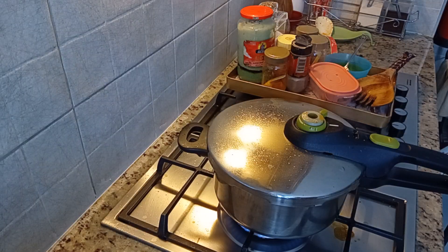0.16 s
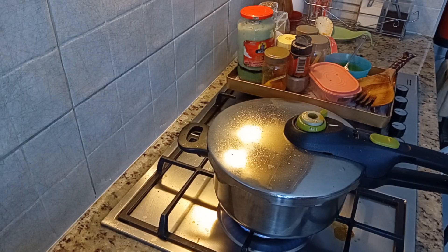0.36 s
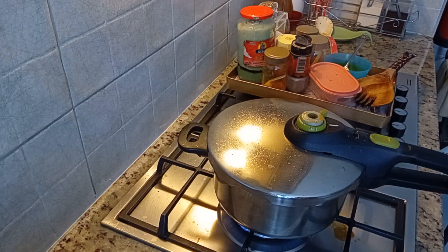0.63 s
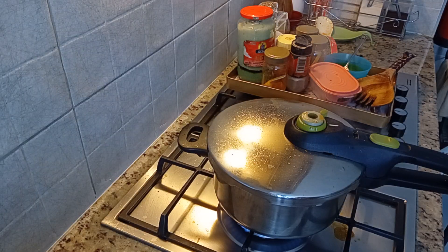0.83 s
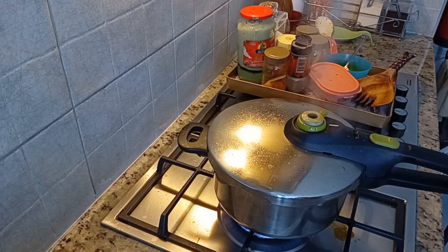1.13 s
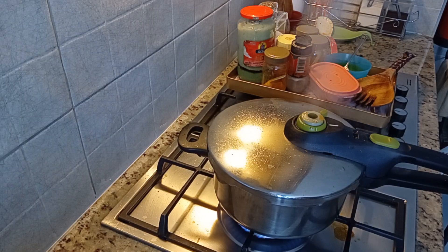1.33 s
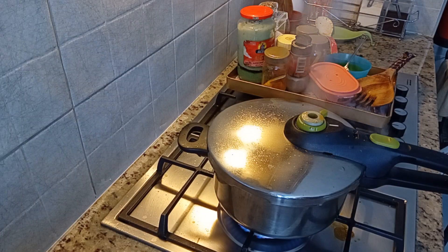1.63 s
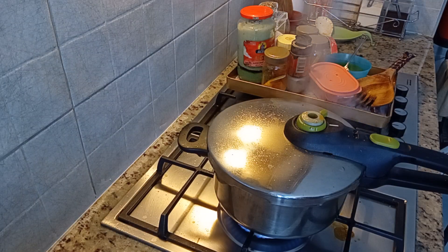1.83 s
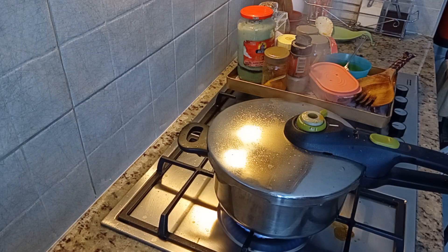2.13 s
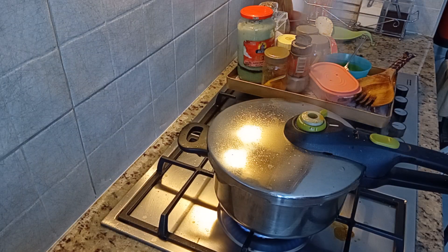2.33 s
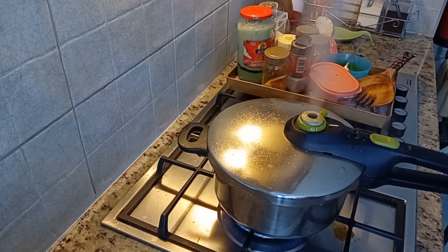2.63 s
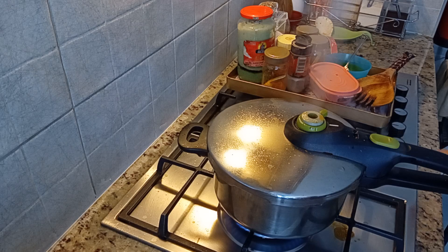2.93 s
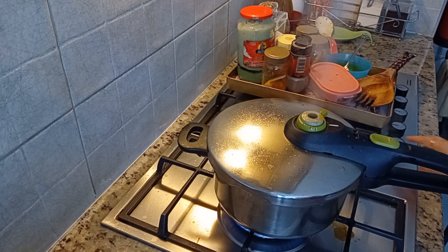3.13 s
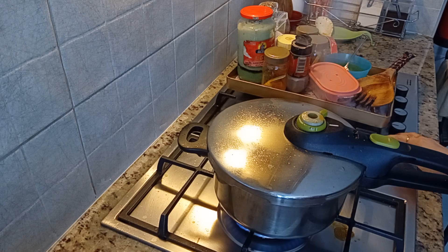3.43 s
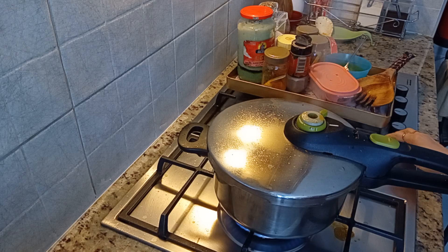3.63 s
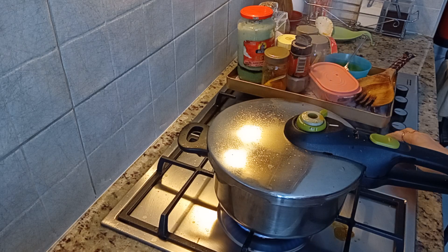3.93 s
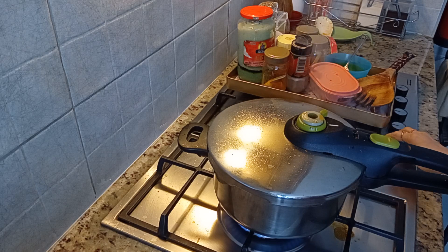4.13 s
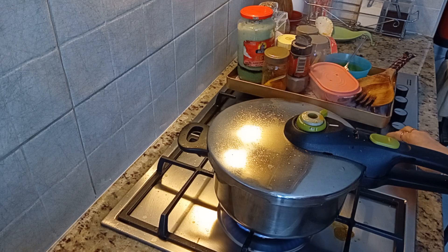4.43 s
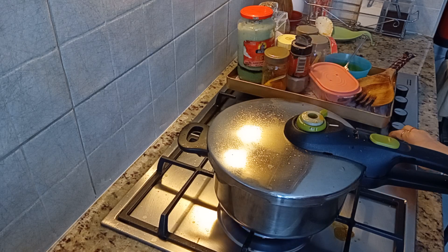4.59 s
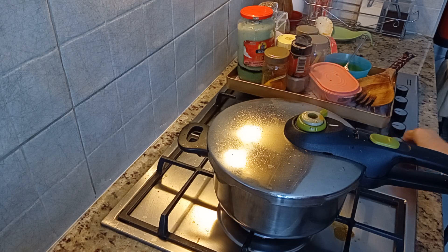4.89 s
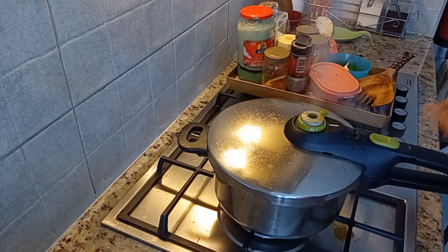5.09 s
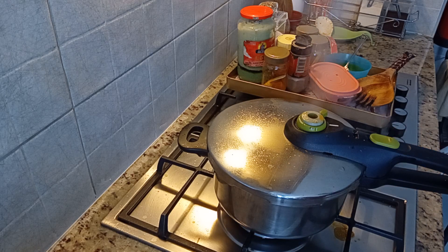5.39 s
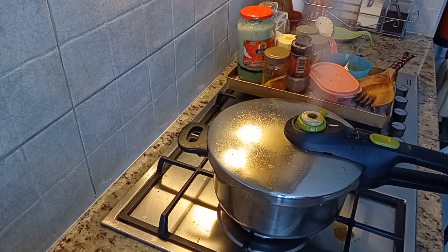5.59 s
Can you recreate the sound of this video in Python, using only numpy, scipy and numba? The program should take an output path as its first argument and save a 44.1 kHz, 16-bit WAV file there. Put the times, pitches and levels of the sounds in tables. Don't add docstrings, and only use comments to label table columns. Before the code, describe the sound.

A pressure cooker on a gas stove vents steam for about 5.7 seconds, heard close in mono in a tiled kitchen with little reverberation. A sharp, bright hiss runs at an even level throughout, airy at the top and slightly resonant. Until about 1.2 seconds, brief thin whistles catch by turns at a high and a lower pitch, strongest around 0.75 to 0.9 and 1.1 to 1.2. Near 0.9 to 1.2 a short, rough, rising squeak comes echoing from another room. From about 1.3 a stronger, breathy, beating whistle takes over, locking on and collapsing in irregular quick pulses, its high pitch wandering; it is especially clear around 1.9 to 2.5. Ringing lid tones flare briefly here and there. Underneath, the burner rumbles and hums very quietly, with soft low puffs, more noticeable near 4.95 and 5.45. After 5.2 the main whistle sags and weakens while a faint lower tone climbs and frays.

```python
import sys
import numpy as np
from scipy import signal
from scipy.fft import rfft, irfft
from scipy.io import wavfile
from scipy.ndimage import uniform_filter1d
from numba import njit

SR = 44100
rng = np.random.default_rng(int(sys.argv[2]) if len(sys.argv) > 2 else 0)


def convert_level_to_amplitude(level_db):
    exponent = np.asarray(level_db, float) / 20
    return 10 ** exponent


def master(y):
    cut = np.clip(np.atleast_2d(y).T, -1, 1)
    pcm = np.round(cut * 32767)
    wavfile.write(sys.argv[1], SR, pcm.astype(np.int16))


N = 253575


def level(x, db):
    return x * convert_level_to_amplitude(db) / np.sqrt(np.mean(x ** 2))


def noise(size=N):
    return rng.standard_normal(size)


@njit
def svf(x, hz, width):
    y, b, l = np.empty(len(x)), 0., 0.
    for i in range(len(x)):
        g, k = np.tan(np.pi * hz[i] / SR), width[i] / hz[i]
        v = (b + g * (x[i] - l)) / (1 + g * (g + k))
        b, l, y[i] = 2 * v - b, l + 2 * g * v, k * v
    return y


def colour(x, spectrum):
    hz, db = np.transpose(spectrum)
    grid = np.fft.rfftfreq(len(x), 1 / SR) + 1
    gain = convert_level_to_amplitude(np.interp(np.log(grid), np.log(hz), db))
    return irfft(rfft(x) * gain, len(x))


def walk(rate):
    k = int(SR / rate)
    held = np.repeat(rng.standard_normal(N // k + 1), k)
    w = uniform_filter1d(uniform_filter1d(held, k), k)[:N]
    return w / np.std(w)


def steady(x, hold_s, share):
    power = uniform_filter1d(x ** 2, int(max(hold_s, .002) * SR)) + 1e-18
    return level(x * power ** (-share / 2), 0)


def ring(hz, width, size=N):
    hz = hz * np.ones(size)
    width = 1.205 * width * np.ones(size)
    return svf(svf(noise(size), hz, width), hz, width) / np.sqrt(width)


def modes(table, flicker_db, rate):
    total = 0
    for hz, width, db in table:
        flicker = convert_level_to_amplitude(db + flicker_db * walk(rate))
        total = total + flicker * np.sqrt(width) * ring(hz + 0.46 * width * walk(10), width)
    return level(total, 0)


def echo(x, t60, wet):
    t = np.arange(SR // 2) / SR
    tail = noise(len(t)) * 1000. ** (-t / t60) * (t > .003)
    tail = tail / np.sqrt(np.sum(tail ** 2))
    wet = np.clip(wet, 0, 1)
    return np.sqrt(1 - wet) * x + np.sqrt(wet) * signal.fftconvolve(x, tail)[:N]


def spells(table, rest_db, rise, fall):
    t = np.arange(N) / SR
    db = rest_db + 0 * t
    for start, end, top_db, *_ in table:
        build = 4 * np.clip((end - t) / (end - start), 0, 1)
        slopes = rise * np.maximum(start - t, 0) + fall * np.maximum(t - end, 0)
        db = np.maximum(db, top_db - build - slopes)
    return convert_level_to_amplitude(db)


def jet():
    # (frequency [Hz], density [dB per Hz])
    body_spectrum = [(380, -23.5), (650, -21.5), (1100, -12), (1460, -16), (1910, -13), (2220, -17.5),
                     (2470, -12.5), (3410, -12), (3630, -13.5), (4000, -10.5), (5530, -5.5), (6640, -1),
                     (8500, -12), (11000, -59), (18700, -120)]
    top_spectrum = [(7500, -42), (8300, -31), (8900, -12.5), (9250, 2.5), (9500, 5), (9950, 3), (10400, 2),
                    (10800, -1.5), (11100, 0.5), (11400, -7), (11900, -7), (12200, -23), (13000, -37)]
    core_spectrum = [(11000, -45), (12000, -19), (12300, -16), (12700, -13), (13000, -17), (13900, -18),
                     (14200, -14), (14500, -8), (14900, -3), (15200, -1), (15900, 0)]
    # (frequency [Hz], width [Hz], level [dB])
    lid_modes = [(1120, 26, -8.5), (1926, 19.5, -5.5), (2394, 54, -4.5), (3430, 38.5, -2.5),
                 (3862, 90, -5.5), (4150, 26, -1), (5104, 54, 0.5)]
    stem_modes = [(6790, 96, 4), (6760, 66, -26), (7510, 49, -3), (8470, 47, -14), (8840, 58, -9)]
    nozzle_modes = [(9640, 72, -1.5), (10290, 61, 3.5), (10630, 180, -3), (11100, 96, -5)]

    body = level(colour(noise(), body_spectrum), -46) * convert_level_to_amplitude(1.19 * walk(9.44))
    top = level(colour(noise(), top_spectrum), -38) * convert_level_to_amplitude(0.49 * walk(12))
    flutter = convert_level_to_amplitude(.4 * walk(10) + .8 * walk(40) + 1.3 * walk(200))
    core_gain = convert_level_to_amplitude(-36 + 1.3 * (np.arange(N) / SR > 1.7))
    core = core_gain * level(flutter * colour(noise(), core_spectrum), 0)
    lid = level(modes(lid_modes, 3.9, 12), -56.5)
    stem = level(modes(stem_modes, 2.5, 22), -52.5)
    nozzle = level(modes(nozzle_modes, 0.75, 19), -44)
    return echo(body, t60=0.48, wet=0.1) + echo(top, 0.038, 0.05) + core + lid + stem + nozzle


def edge_tone(hz, gain, width, wobble):
    return gain * steady(ring(hz + wobble * width * walk(25), width), hold_s=.022, share=.9)


def locked(table, rest_db):
    return spells(table, rest_db, rise=352, fall=380)


def early_stages(t):
    # (start [s], end [s], level [dB], pitch [Hz])
    high_locks = [
        (-.02, .03, -47, 6600),
        (.19, .255, -52, 6790),
        (0.37, 0.483, -43.5, 6630),
        (.565, .6, -45, 6600),
        (0.726, 0.772, -39.5, 6760),
        (0.878, 0.925, -37.5, 6755),
        (1.098, 1.2, -48, 6850),
    ]
    # (start [s], end [s], level [dB])
    low_locks = [
        (.1, .2, -54),
        (.51, .59, -49),
        (.68, .71, -53),
        (.89, .975, -47),
        (1.05, 1.11, -41),
        (1.13, 1.21, -38.5),
        (1.23, 1.27, -47),
    ]
    early = np.clip((1.29 - t) / 0.028 + 1, 0, 1)

    middles = np.mean(np.array(high_locks)[:, :2], axis=1)
    high_hz = np.interp(t, middles, np.array(high_locks)[:, -1])
    high = convert_level_to_amplitude(0.5) * edge_tone(high_hz, early * locked(high_locks, -55), 43.0, 0.31)

    settle_s = [.88 - .02, .88 + .02]
    sag_hz = 1500 * np.maximum(t - low_locks[-1][0], 0)
    low_hz = np.interp(t, settle_s, (4810, 4736)) - sag_hz
    low_width = np.interp(t, settle_s, (62, 20))
    low = convert_level_to_amplitude(1.5) * edge_tone(low_hz, early * locked(low_locks, -58), low_width, 0.41)
    return high + low


def main_stage(t):
    # (time [s], pitch [Hz], resting level [dB], width [Hz])
    opening = [(1.24, 6180, -47, 170), (1.36, 6150, -44, 150), (1.43, 6000, -44, 150),
               (1.62, 6310, -45, 120), (1.8, 6460, -47, 120), (1.93, 6190, -43, 90), (2.32, 6235, -44, 85),
               (2.68, 6125, -42, 70), (2.82, 6280, -46, 90), (3.08, 6120, -43, 70), (3.55, 6140, -42, 50),
               (3.63, 6290, -45, 80), (4.03, 6190, -41, 55), (4.63, 6285, -41, 55), (5.03, 6040, -43, 55),
               (5.34, 6060, -43, 65), (5.42, 5925, -44, 50), (5.62, 5795, -47, 65)]
    # (start [s], end [s], level at the end [dB])
    main_locks = [(1.275, 1.31, -38), (1.36, 1.47, -34), (1.56, 1.62, -40.5), (1.9, 2.03, -34),
                  (2.06, 2.09, -33), (2.12, 2.195, -32.5), (2.24, 2.33, -36.5), (2.38, 2.535, -32),
                  (2.575, 2.6, -34.5), (2.63, 2.65, -36.5), (2.86, 2.94, -35), (2.985, 3.01, -36),
                  (3.375, 3.53, -33), (3.55, 3.58, -37), (3.82, 3.9, -37.5), (3.92, 4.0, -38),
                  (4.07, 4.14, -34.5), (4.18, 4.3, -36), (4.33, 4.42, -37.5), (4.465, 4.5, -32.5),
                  (4.565, 4.6, -38), (4.68, 4.75, -36.5), (4.8, 4.86, -32.5), (4.89, 4.98, -35.5),
                  (5.02, 5.1, -39), (5.17, 5.26, -39), (5.29, 5.35, -38), (5.4, 5.475, -33.5),
                  (5.535, 5.555, -38.5), (5.64, 5.71, -41.5)]
    s, *columns = np.transpose(opening)
    hz, rest_db, width = (np.interp(t, s, c) for c in columns)
    gain = locked(main_locks, rest_db) * np.clip((t - s[0]) / .02 + 1, 0, 1)
    strong_strand = edge_tone(hz - 12, gain, .8 * width, .3)
    weak_strand = convert_level_to_amplitude(-4) * edge_tone(hz + .9 * width, gain, .8 * width, .4)
    skirt = np.sqrt(gain) * level(ring(hz + 40., 750.0), -30.5)
    octave = gain * level(ring(2 * hz, 250.), -28)
    return strong_strand + weak_strand + skirt + octave


def late_stage(t):
    climb_s = np.maximum(t - 5.29, 0)
    hz = 2850 + 1450 * climb_s
    width = 45 + 800 * climb_s
    gain = convert_level_to_amplitude(-56) * np.clip((t - 5.2) / 0.023 + 1, 0, 1)
    return edge_tone(hz, gain, width, .3) * convert_level_to_amplitude(2.0 * walk(30))


def whistle():
    t = np.arange(N) / SR
    return early_stages(t) + main_stage(t) + late_stage(t)


def burner():
    # (frequency [Hz], density [dB per Hz])
    rumble_spectrum = [(15, -39), (25, 5), (44, -42), (86, -11), (161, 3), (297, -8.5), (368, -5),
                       (469, -1), (660, -8), (750, -6.5), (980, -1), (1650, -120)]
    # (frequency [Hz], width [Hz], level [dB])
    hum_modes = [(90.8, 10, 2), (162.7, 17, 3.5), (250, 26, -2), (320, 7.7, -3.5), (368, 17.3, 2),
                 (383, 11, -3), (425, 5.5, -1.5), (734, 14, -6.5), (970, 27.5, -3.5), (1270, 32, -3.5)]
    # (start [s], end [s], level [dB])
    flame_puffs = [(.14, .17, -64), (.36, .4, -58), (.755, .78, -58), (.85, .88, -68), (1.12, 1.15, -61.5),
                   (1.36, 1.42, -66), (2.0, 2.04, -61), (2.26, 2.3, -66), (2.33, 2.36, -59),
                   (2.56, 2.62, -66.5), (2.65, 2.7, -61), (3.13, 3.17, -66), (3.52, 3.6, -64.5),
                   (4.14, 4.19, -70), (4.28, 4.33, -69), (4.54, 4.57, -65), (4.93, 4.97, -55.5),
                   (5.03, 5.2, -66.5), (5.28, 5.31, -62.5), (5.44, 5.5, -52), (5.51, 5.56, -54.5),
                   (5.67, 5.71, -65)]
    rumble = level(colour(noise(), rumble_spectrum), -72)
    hums = level(modes(hum_modes, 1.5, 5.44), -67.0)
    puff_gain = spells(flame_puffs, -75.5, rise=202, fall=266)
    puffs = puff_gain * steady(ring(88.0, 59.0), hold_s=.04, share=0.85)
    return rumble + hums + puffs


def flares():
    # (middle [s], frequency [Hz], level [dB],
    # length [s])
    mode_flares = [(0.32, 3800, -54, 0.088), (0.36, 3430, -55, 0.061), (1.267, 3960, -53, 0.11),
                   (1.571, 2950, -54, 0.041), (1.74, 1930, -56.5, 0.06), (1.776, 972, -55.5, 0.055),
                   (2.133, 962, -59, 0.12), (2.25, 2650, -59, 0.15), (2.283, 320, -64.5, 0.063),
                   (2.283, 967, -58, 0.06), (2.461, 2394, -52, 0.12), (2.987, 2512, -53.5, 0.092),
                   (3.01, 4930, -48.5, 0.12), (3.292, 1096, -52.5, 0.055), (3.435, 3430, -56.0, 0.081),
                   (3.84, 3915, -55, 0.043), (3.909, 3430, -53, 0.061), (4.23, 4620, -54, 0.06),
                   (4.45, 5030, -52, 0.06), (4.463, 4310, -54, 0.083), (4.754, 3500, -55, 0.06),
                   (4.765, 5080, -49, 0.054), (4.916, 3920, -53, 0.051), (4.967, 4640, -49.5, 0.06),
                   (4.993, 485, -64.5, 0.045), (5.058, 2660, -56, 0.052), (5.51, 3890, -50.5, 0.12),
                   (5.702, 887, -59.5, 0.066), (5.709, 1885, -59.0, 0.048), (5.717, 3920, -56.0, 0.03)]
    further_flares = [(0.188, 3920, -59, 0.23), (1.5, 4820, -54, .25), (1.976, 1022, -60, 0.084),
                      (2.3, 4120, -59, 0.34), (2.92, 3430, -58.5, 0.45), (2.9, 970, -66, 0.97),
                      (3.549, 1270, -63.5, 0.28), (4.13, 540, -67, 0.067), (4.15, 250, -74, 0.92),
                      (4.33, 4220, -54.5, 0.15), (4.447, 522, -68, 0.062), (4.55, 4130, -59, 0.35),
                      (4.681, 3430, -57, 0.2), (4.816, 1270, -64.5, 0.16), (5.2, 1270, -67, 0.45),
                      (5.303, 3540, -55.5, .08), (5.42, 3500, -55, 0.072), (5.43, 4650, -56, .08)]
    out = np.zeros(N + 2 * SR)
    t = np.arange(-SR // 2, SR // 2) / SR
    for s, hz, db, length in mode_flares + further_flares:
        swell = np.exp(-.5 * (t / (0.36 * length)) ** 2)
        tone = steady(ring(hz, min(50., hz / 25), size=SR), hold_s=.04, share=.6)
        start = int((s + .5) * SR)
        out[start:start + SR] += convert_level_to_amplitude(db) * swell * tone
    return out[SR:SR + N]


def squeak():
    # (start [s], end [s], level [dB])
    bursts = [
        (.87, .94, -50),
        (.955, .985, -45),
        (1.0, 1.055, -51.5),
        (1.09, 1.2, -66),
    ]
    # (multiple of the pitch [1], level [dB])
    overtones = [(3, -12), (3.8, -8), (4, 4), (5, -1), (5.55, -4), (6, -3)]
    hz = np.interp(np.arange(N) / SR, (.85, .97), (415, 455))
    gain = spells(bursts, -120, rise=220., fall=360.0)
    phase = 2 * np.pi * np.cumsum(hz * (1 + .009 * walk(120))) / SR
    tone = level(sum(convert_level_to_amplitude(db) * np.sin(k * phase) for k, db in overtones), 0)
    rough = convert_level_to_amplitude(2.0 * walk(69.9))
    return echo(gain * rough * tone, t60=.5, wet=.7)


def scene():
    whistle_in_kitchen = echo(whistle(), t60=0.065, wet=0.13)
    mono = jet() + whistle_in_kitchen + flares() + burner() + squeak()
    return np.array([mono, mono])


def band_limit(x):
    return signal.sosfilt(signal.butter(12, 17120, fs=SR, output="sos"), x)


def record(dry):
    keep = np.clip((15750 - np.fft.rfftfreq(N, 1 / SR)) / 60 + .5, 0, 1) ** 2
    mix = irfft(rfft(dry) * keep, N)
    return band_limit(mix)


dry = scene()
out = record(dry)
master(out)
```